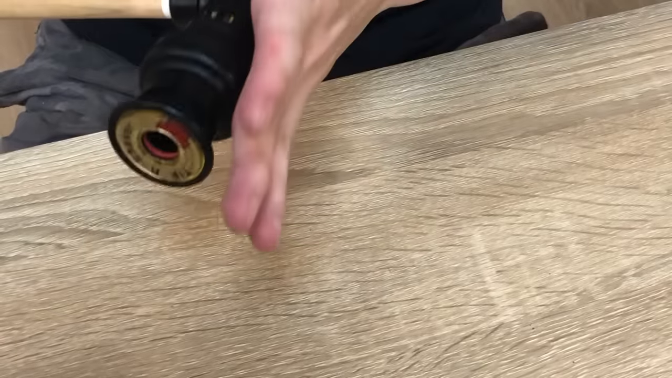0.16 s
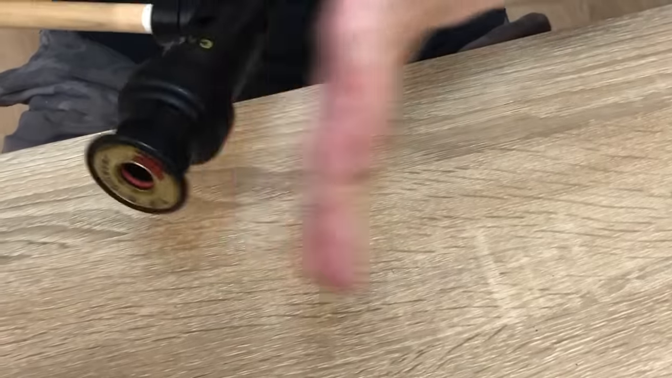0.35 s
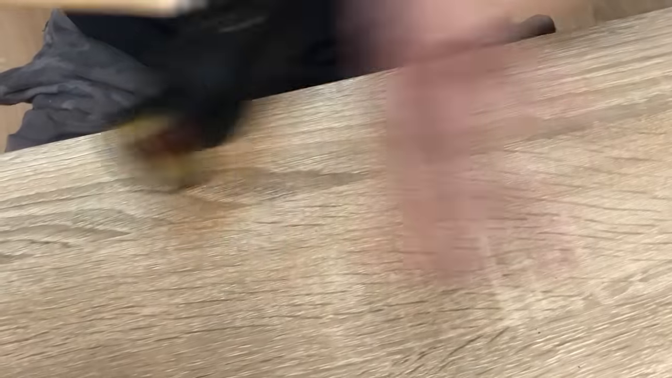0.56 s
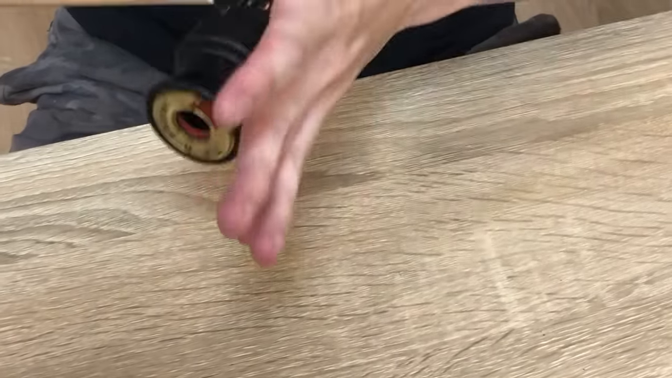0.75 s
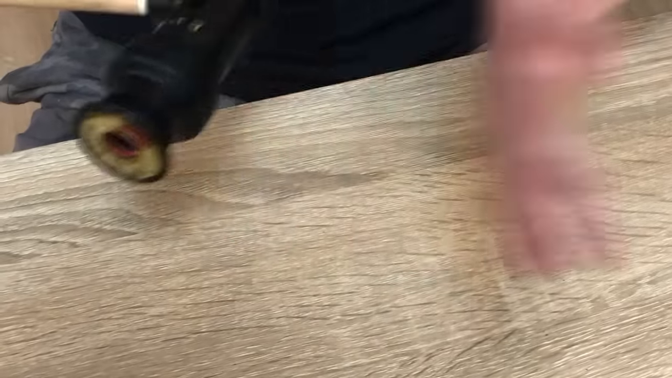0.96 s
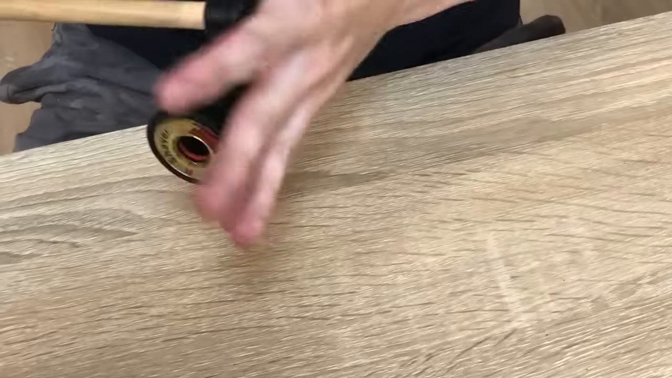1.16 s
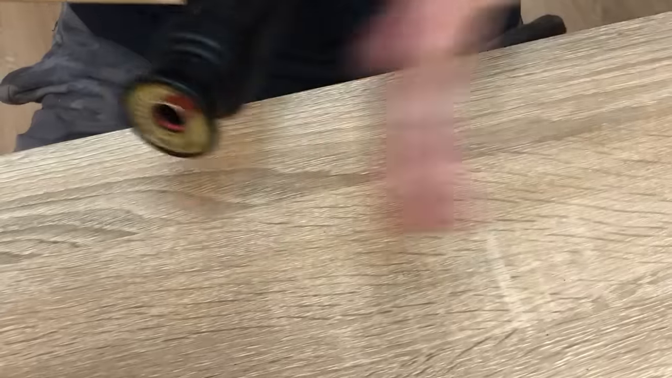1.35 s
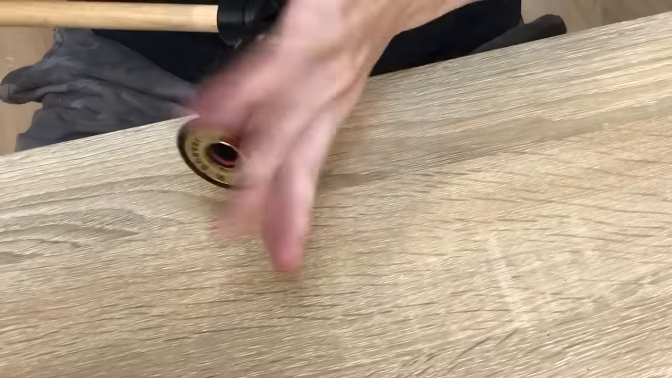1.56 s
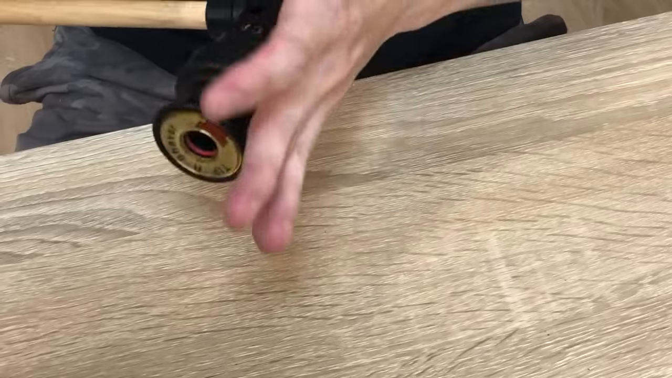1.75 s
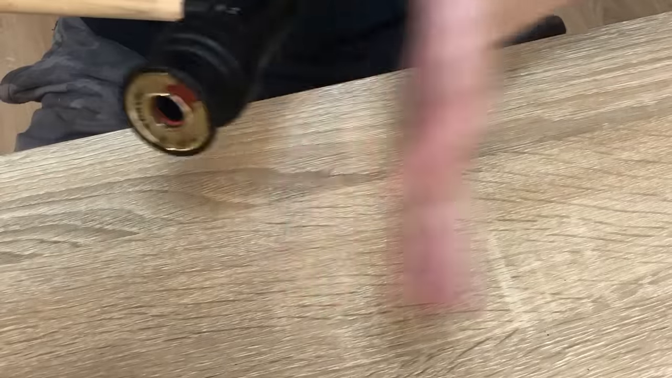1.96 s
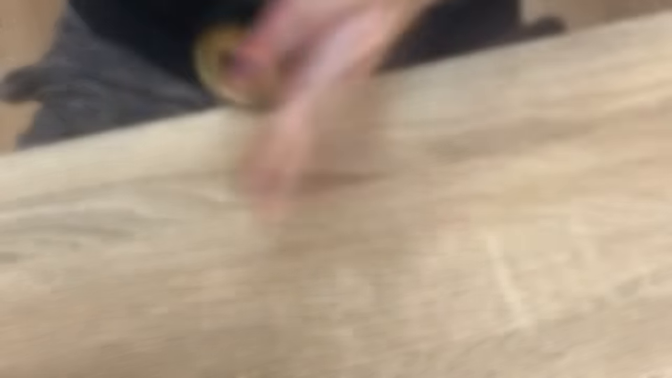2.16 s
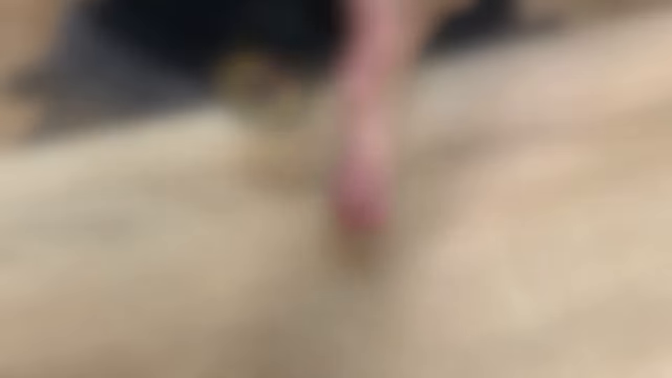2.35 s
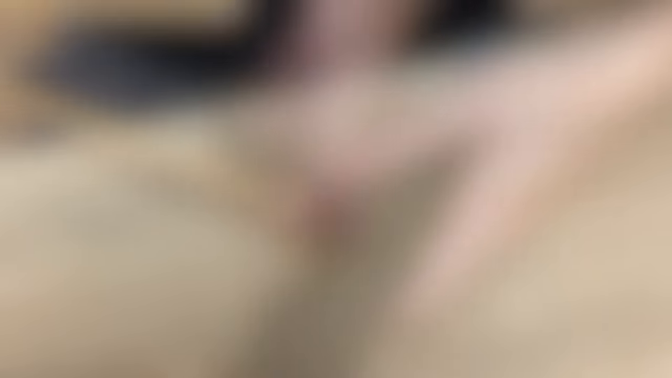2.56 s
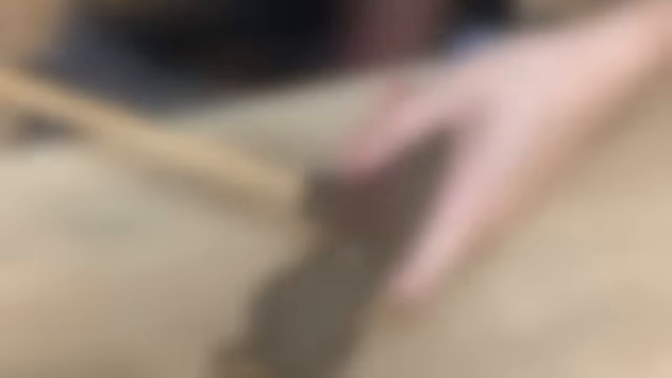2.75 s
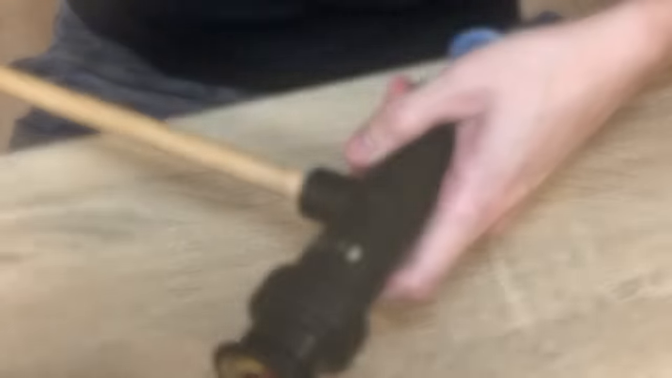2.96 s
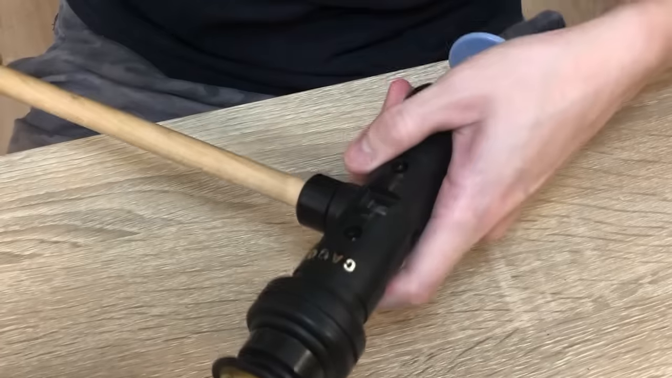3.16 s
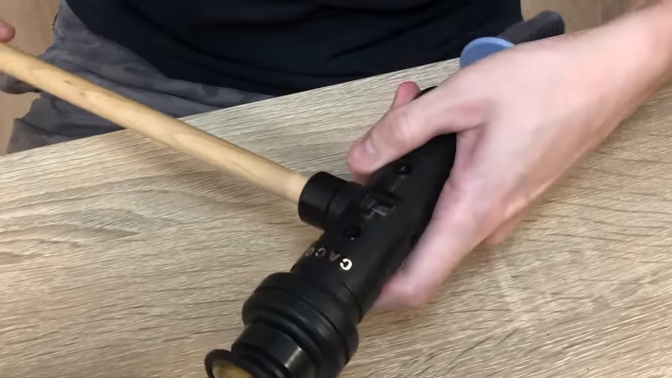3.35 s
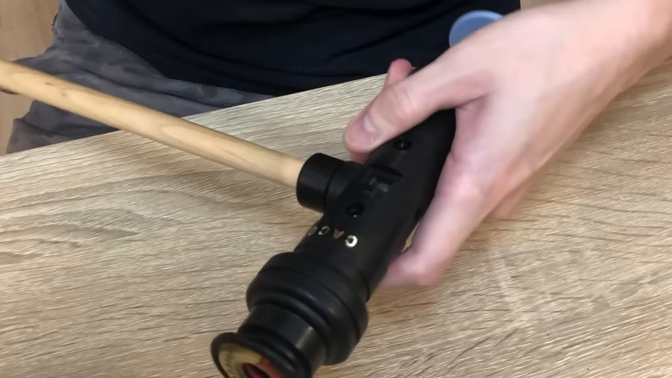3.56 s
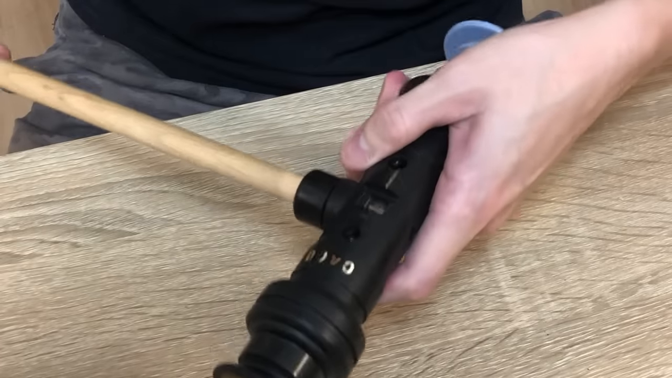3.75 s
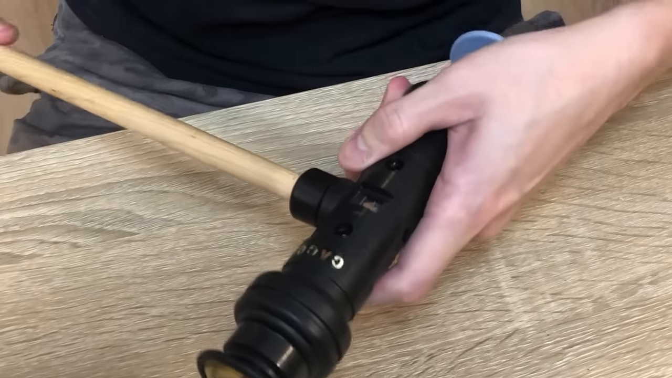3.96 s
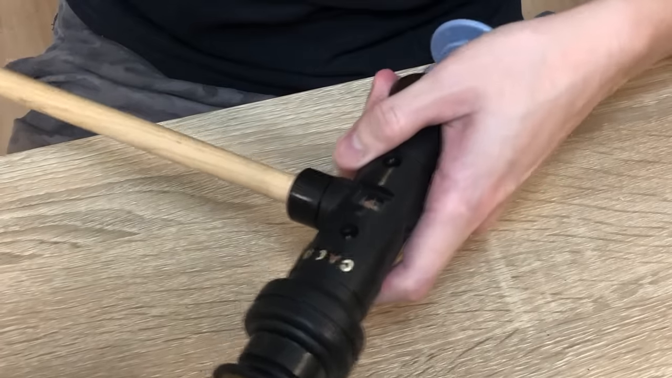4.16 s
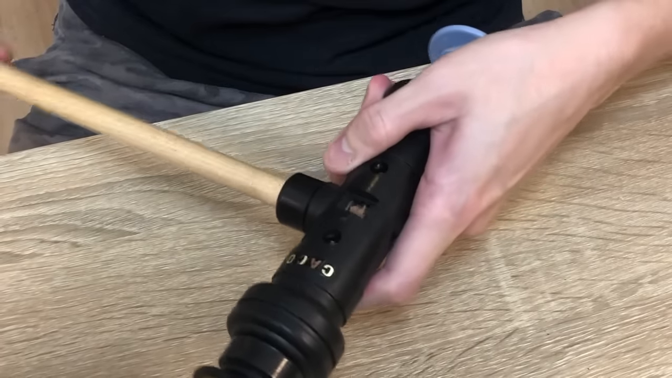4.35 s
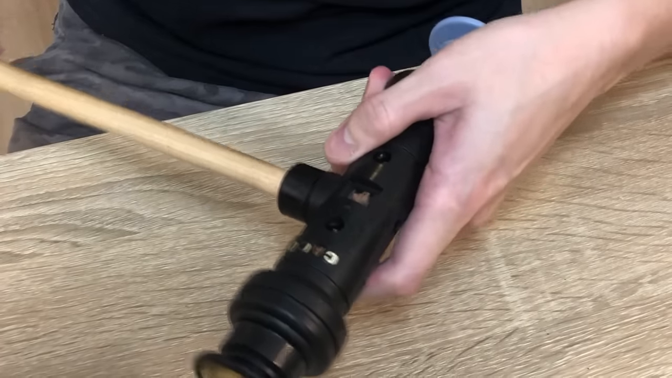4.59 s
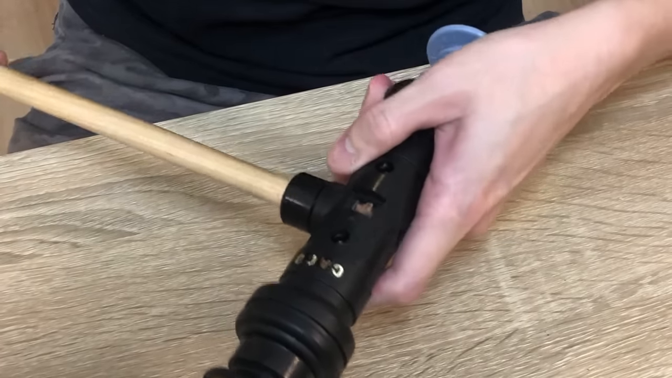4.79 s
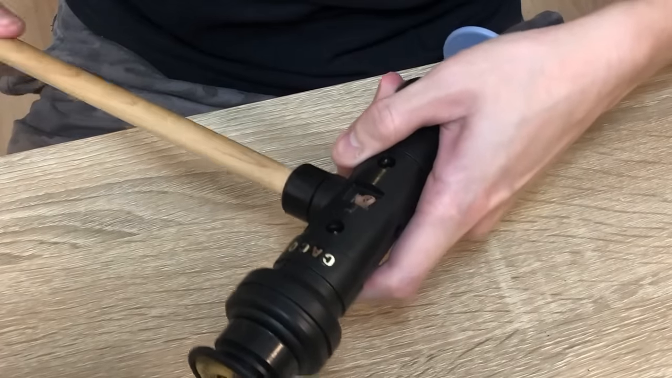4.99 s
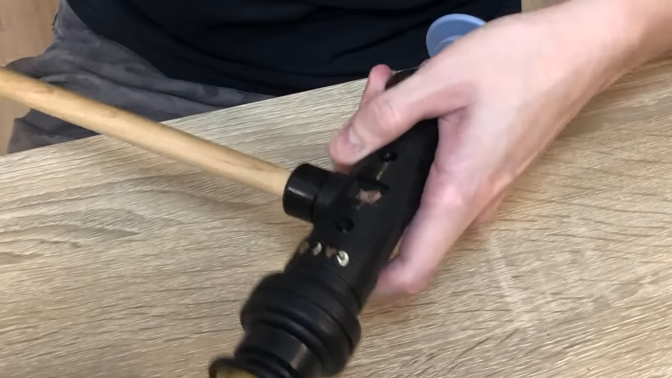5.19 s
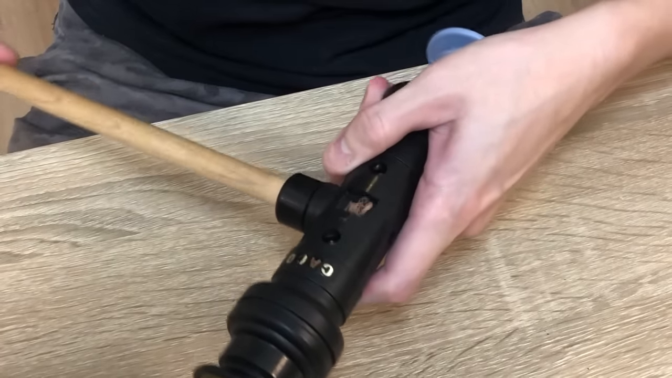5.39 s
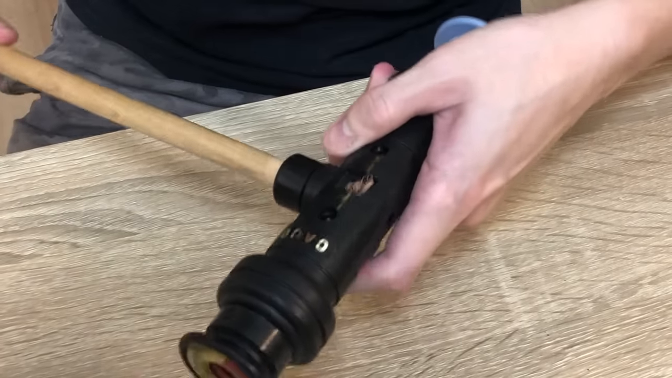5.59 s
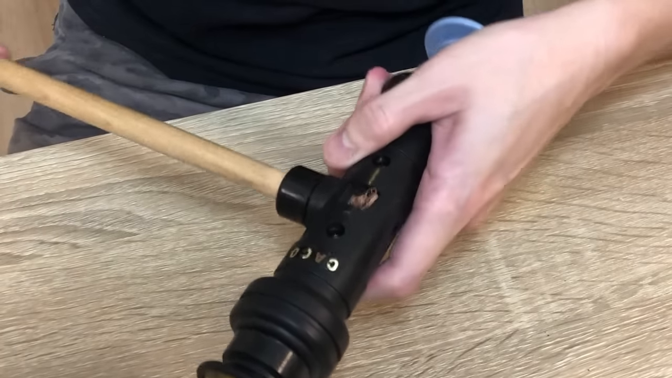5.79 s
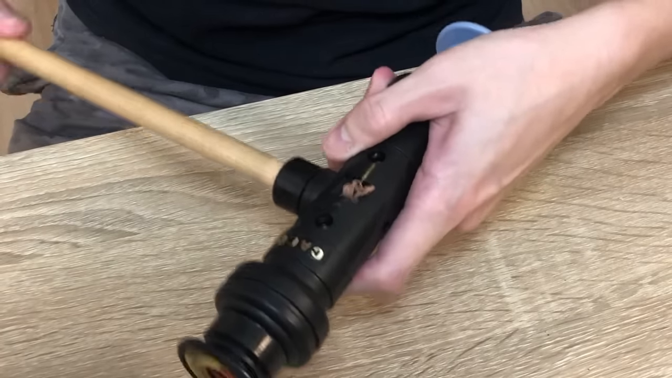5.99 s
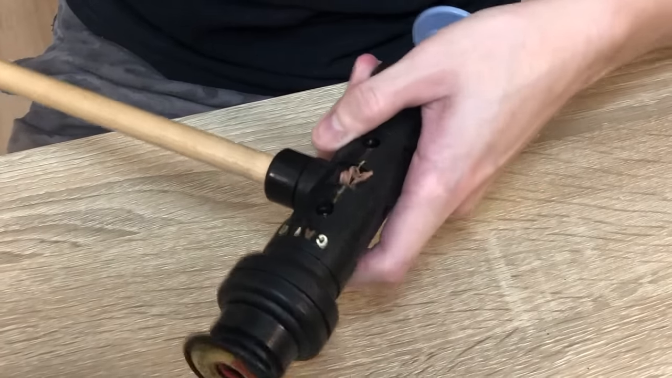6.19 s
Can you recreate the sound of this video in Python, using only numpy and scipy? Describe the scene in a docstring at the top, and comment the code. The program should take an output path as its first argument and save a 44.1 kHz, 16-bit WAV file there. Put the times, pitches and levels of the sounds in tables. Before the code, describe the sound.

A small quiet indoor room, recorded close over a table, with soft air noise and a very faint low hum. The tail of a hard plastic clack fades at the opening; dull little bumps on the table follow at 0.3 s. Sharp clacks land at 0.63, a quick pair at 1.1 and 1.16, then louder ones at 1.55, 2.2 and 2.59 s, each a bright touch, a hard slam milliseconds later and a brief hollow plastic ring. Light finger rubs and ticks lie between. The last ring is abruptly cut at 2.62 s. Then a faint, swelling scrape at 3.2 s and a crisp tick at 3.45. Five stronger dry, gritty leather-shaving rasps follow at 3.8, 4.35, 4.9, 5.4 and 5.9 s, each about a tenth of a second, starting with a bright bite and ending quickly, with barely audible regripping between.

```python
"""A small, quiet room: a plastic cue-tip tool is worked by hand over a table, amid soft air noise and a faint hum.
Its cutter snaps over several times: a bright first contact, then a hard clack that rings the housing.
After a cut in the scene the cue is twisted in the tool, and the blade shaves the leather tip in six strokes.
Impacts are coloured noise bursts, the housing is a bank of decaying sines, shaving is resonant friction noise."""
import sys
import numpy as np
from scipy import signal
from scipy.fft import rfft, irfft
from scipy.io import wavfile

SR = 44100
rng = np.random.default_rng(int(sys.argv[2]) if len(sys.argv) > 2 else 0)


def transcribe(u):
    """Save the signal u as a 16-bit wav file named by the first command-line argument.

    u: samples, shape (n,) or (channels, n), limited to [-1, 1]; the rate is SR.
    q: integer samples, one column per channel.
    """
    v = np.clip(np.atleast_2d(u).T, -1, 1)
    q = np.round(v * 32767).astype(np.int16)
    wavfile.write(sys.argv[1], SR, q)


N = 274743
LEAD_S = 0.2  # time rendered before the opening, so that earlier sounds can ring into it
PAD = int(LEAD_S * SR)
TIME = np.arange(-PAD, N) / SR
HZ = np.maximum(np.fft.rfftfreq(4096, 1 / SR), 1)  # frequency grid of all colours
TABLE_LAG_S, SHAVE_LAG_S = 0.0006, 0.00136  # lag of the table's reflection


def undb(db):
    """Decibels to gain."""
    return 10 ** (np.asarray(db) / 20)


def unit(x):
    """Scale to unit energy."""
    return x / np.sqrt(np.sum(x ** 2))


def decay(t, t60):
    """Exponential decay that falls by 60 dB in t60 seconds."""
    return np.exp(-np.log(1000) * t / t60)


def contour(points):
    """Join (Hz, value) points on a log-frequency axis."""
    f, value = np.transpose(points)
    return np.interp(np.log(HZ), np.log(f), value)


def peak(hz, width_hz, db):
    """A resonance as a bump in dB."""
    return db / (1 + (2 * (HZ - hz) / width_hz) ** 2)


def response(db):
    """Causal, minimum-phase impulse response of unit energy with the given colour."""
    cepstrum = irfft(np.log(undb(db)))
    half = len(cepstrum) // 2
    # fold the cepstrum onto positive time
    cepstrum[1:half] *= 2
    cepstrum[half + 1:] = 0
    return unit(irfft(np.exp(rfft(cepstrum)))[:half])


def through(x, ir):
    """Pass a sound through an impulse response and keep its length."""
    return signal.fftconvolve(x, ir)[:len(x)]


def add(out, s, x, lag_s=0.001, bounce=0):
    """Mix a sound in: row 0 reaches the microphone with its bounce off the table, row 1 feeds the room."""
    i = max(int(s * SR) + PAD, 0)
    fractional_delay = np.sinc(np.arange(128) - lag_s * SR)
    bounced = signal.lfilter(fractional_delay, 1, x)
    direct = (x + bounce * bounced) / np.hypot(1, bounce)
    paths = np.array([direct, x])
    out[:, i:i + len(x)] += paths[:, :len(TIME) - i]


def wavering_noise(count, rough_db, catch_hz=450):
    """Dense noise grains whose strength wanders at random, as when surfaces catch and let go."""
    at = np.arange(count) * catch_hz / SR
    catches = np.interp(at, np.arange(count), rng.standard_normal(count))
    x = rng.standard_normal(count) * undb(rough_db * catches)
    return x / x.std()


def chatter(length_s, rise=0.35):
    """Two hard faces meet: a burst of tiny impacts that swells and dies, nearly flat in spectrum."""
    t = np.arange(SR // 20) / SR
    age = t / length_s
    swell = 1 - np.exp(-age / rise)
    fade = swell * np.exp(-age)
    x = rng.standard_normal(len(t))
    for _ in range(3):
        # even out the spectrum while keeping the burst short
        spectrum = rfft(x * fade)
        x = irfft(spectrum / np.abs(spectrum), len(t))
        fade = np.sqrt(swell) * np.exp(-(age / 4) ** 2)
    return unit(x * fade)


# Colour of the still air. Each row: frequency in Hz, relative density in dB per Hz.
AIR_COLOUR = [(15, -60.5), (25, -19.5), (43, -10), (92, -6.5), (123, -2.5), (249, -5), (354, -13.5),
              (384, -10.5), (476, -11), (545, -12.5), (1130, -11.5), (2690, -26), (2990, -28.5),
              (5280, -33), (16000, -42)]
AIR_DB = -66.5
HUM_HZ, HUM_DB = 122, -79


def air(sway_db=2.0):
    """Soft, slowly swaying noise of the room with a faint hum whose phase wavers."""
    noise = wavering_noise(len(TIME), rough_db=sway_db, catch_hz=6)
    hiss = through(noise, response(contour(AIR_COLOUR)))
    waver = np.interp(TIME, np.linspace(0, N / SR, num=50), rng.standard_normal(50))
    hum = np.sqrt(2) * np.sin(2 * np.pi * HUM_HZ * TIME + 0.7 * waver)
    return undb(AIR_DB) * hiss + undb(HUM_DB) * hum


# Reverberant tail. Each row: band centre in Hz, t60 in seconds, level in dB.
REVERB_BANDS = [(149.5, 0.27, -4), (500, 0.22, -5.5), (1200, .4, -8.5), (2940, 0.36, -9), (5960, 0.36, -12),
                (10000, .32, -10.5), (15000, 0.21, -13.5)]
# Early reflections off near surfaces. Each row: delay in seconds, level in dB.
EARLY_REFLECTIONS = [(0.0108, -15), (.016, -21), (.039, -24)]


def room(build_s=0.007):
    """Impulse response of the room: a few near surfaces and a diffuse tail with a decay for each band."""
    t = np.arange(SR * 3 // 5) / SR
    noise = rfft(rng.standard_normal(len(t)))
    hz = np.maximum(np.fft.rfftfreq(len(t), 1 / SR), 1)
    centres = np.log([row[0] for row in REVERB_BANDS])
    build = 1 - np.exp(-(t / build_s) ** 2)
    ir = np.zeros(len(t))
    # bands crossfade into each other
    for share, (_, t60, db) in zip(np.eye(len(REVERB_BANDS)), REVERB_BANDS):
        band = irfft(noise * np.interp(np.log(hz), centres, share), len(t))
        ir += undb(db) * band * unit(decay(t, t60) * build)
    for delay_s, db in EARLY_REFLECTIONS:
        ir[int(delay_s * SR)] += undb(db)
    return ir


# Modes of the housing. Each row: nominal frequency in Hz, mean relative level in dB, t60 in seconds.
HOUSING_MODES = [(784.5, -5, 0.13), (1172, -3.5, 0.16), (1217, -7.5, 0.24), (1360, -3, 0.16),
                 (2000, -8, .18), (2460, -9, 0.42), (2900, -7.5, .2), (3039, -7.5, 0.23), (3100, -7, 0.19),
                 (3310, -5, 0.17), (3400, -1, 0.17), (4310, -6, .18), (5500, -14.5, .2), (5950, -9, 0.17),
                 (6670, -11, .18)]


def housing(scatter_db=2):
    """Decaying sines ring the housing; the grip shifts its modes a little at each blow."""
    t = np.arange(SR // 2) / SR
    ring = np.zeros(len(t))
    for hz, db, t60 in HOUSING_MODES:
        detune, size = rng.standard_normal(2)
        mode = np.sin(2 * np.pi * hz * (1 + 0.0034 * detune) * t)
        ring += undb(db + scatter_db * size) * mode * decay(t, t60)
    return unit(ring)


# After each full stroke the fingers take a new hold, with a rub and a faint tick.
REGRIP_S, REGRIP_SPREAD_S, REGRIP_DB = 0.272, 0.021, -77.5  # wait from the stroke's start, spread, rub level


def regrips():
    """Moments at which the fingers take a new hold: after every stroke but the first, light one."""
    return [stroke[0] + REGRIP_S for stroke in STROKES[1:]]


# Light ticks of the tool in the grip and of the blade snagging.
# Each row: start in seconds, relative level in dB, centre in Hz, width in octaves.
STRAY_TICKS = [(.886, -46.5, 3200, 0.25), (1.03, -48.5, 8040, 2.2), (1.75, -39.5, 3170, 0.32),
               (1.857, -52, 7050, 1), (2.676, -46, 8980, 0.55), (3.183, -50.5, 7500, 0.84),
               (3.455, -25.5, 4080, 1.6), (4.903, -28.5, 7035, 0.78), (4.9436, -31, 9000, 0.96),
               (5.1987, -41.5, 4050, 0.6)]
# The catch lets go just before each clack: level against the clack in dB, centre in Hz, width in octaves.
CATCH_TICK = (-45.5, 4550, 1)
# The blade bites as each full stroke begins: level against the stroke in dB, centre in Hz, width in octaves.
BITE_TICK = (9.4, 8600, .85)
# Tick of a new hold: relative level in dB, centre in Hz, width in octaves.
HOLD_TICK = (-54, 3600, 1.0)
CATCH_LEAD_S, BITE_DELAY_S = 0.022, 0.003


def ticks():
    """Gather the stray ticks, the catch before each clack, the bite of full strokes and each new hold."""
    catch_db, *catch_colour = CATCH_TICK
    bite_db, *bite_colour = BITE_TICK
    catches = [(s - CATCH_LEAD_S, db + catch_db, *catch_colour) for s, db, *_ in CLACKS]
    bites = [(s + BITE_DELAY_S, db + bite_db, *bite_colour) for s, _, db, *_ in STROKES[1:]]
    holds = [(s, *HOLD_TICK) for s in regrips()]
    return STRAY_TICKS + catches + bites + holds


# Soft bumps against the table. Each row: start in seconds, level in dB, frequency in Hz, t60 in seconds.
TABLE_BUMPS = [(0.275, -52, 423, 0.072), (0.279, -49, 199, 0.052), (.296, -47.5, 100, 0.049)]
# Fingers shifting their grip between clacks. Each row: centre in seconds, spread in seconds, level in dB.
GRIP_SHIFTS = [(.876, 0.0062, -70.5), (1.02, 0.014, -77), (1.335, 0.013, -76), (1.915, .012, -80.5)]
TICK_S = 0.0007


def handling(tick_db=4, tick_low_hz=1500, tick_high_hz=12500, bounce=0.14, ring_db=-19,
             rub_hz=5500, rub_width_hz=9000):
    """Small noise ticks that ring the housing a little, dull sine bumps and the noisy rub of fingers."""
    out = np.zeros((2, len(TIME)))
    # small plastic parts radiate little bass and blunt the highest treble
    plastic = -10 * np.log10((1 + (tick_low_hz / HZ) ** 6) * (1 + (HZ / tick_high_hz) ** 6))
    for s, db, hz, octaves in ticks():
        colour = plastic - 40 * np.log10(1 + (np.log2(HZ / hz) / octaves) ** 2 / 2)
        tick = undb(db + tick_db) * signal.fftconvolve(chatter(TICK_S), response(colour))
        add(out, s, tick, TABLE_LAG_S, bounce)
        add(out, s, undb(ring_db) * signal.fftconvolve(tick, housing()))
    t = np.arange(SR // 5) / SR
    for s, db, hz, t60 in TABLE_BUMPS:
        add(out, s, undb(db) * np.sin(2 * np.pi * hz * t) * decay(t, t60))
    rubs = GRIP_SHIFTS + [(s, REGRIP_SPREAD_S, REGRIP_DB) for s in regrips()]
    grip = sum(undb(db) * np.exp(-0.5 * ((TIME - s) / spread) ** 2) for s, spread, db in rubs)
    skin = through(wavering_noise(len(TIME), rough_db=5.5), response(peak(rub_hz, rub_width_hz, 22)))
    return out + grip * skin


# The pressure swells around this share of a stroke, over this share of it; then the rasp dies away.
SWELL_AT, SWELL_SPAN, RELEASE_DB_PER_S = 0.81, 0.33, 432


def pressure(t, length_s, attack_s, swell_db):
    """One twist of the wrist: the blade sets in, its pressure changes towards the end and it lets go."""
    swell = swell_db * np.exp(-0.5 * ((t / length_s - SWELL_AT) / SWELL_SPAN) ** 2)
    release = RELEASE_DB_PER_S * np.maximum(t - length_s, 0)
    return np.minimum(t / attack_s, 1) * undb(swell - release)


# Strokes of the blade. Each row: start in seconds, length in seconds, relative level in dB, attack in seconds,
# swell in dB, lift of the rasp's low end in dB, frequency in Hz at which the blade sings most.
STROKES = [(3.206, 0.18, -61.5, 0.025, 7, -5.5, 9200), (3.822, .104, -49.5, .002, 2.5, -2, 11300),
           (4.362, 0.089, -47.5, 0.0045, -3, -4.5, 3700), (4.884, 0.1, -47, 0.0064, 0, -2, 9200),
           (5.396, 0.1, -50, 0.01, 2, 2, 6440), (5.912, .103, -50, .007, 2, 2.5, 6500)]
# Colour of the shaving before its tilt. Each row: frequency in Hz, relative level in dB.
RASP_COLOUR = [(200, -34), (1000, -22), (1800, -10.5), (2800, -4.5), (4500, -1.5), (7000, -4.5), (8700, -5),
               (11000, -5), (15500, -5.5)]
# Resonances of the blade and its slot. Each row: nominal frequency in Hz, width in Hz, lift in dB.
BLADE_RESONANCES = [(2950, 410, 4.5), (3440, 350, 1.5), (4330, 470, 3), (6870, 1000, 3), (7300, 1100, 5.5),
                    (10100, 460, 6), (11350, 590, 3.5), (11900, 660, 2.5), (14010, 700, 5)]
RASP_TILT_DB, SING_DB = 0.47, 4.5  # per octave; lift where the blade sings


def shaving(cut_db=-0.84, wander=0.0035, bounce=0.44, sing_width_hz=550, room_colour=0.33):
    """The blade tears leather fibres: friction noise through resonances that shift from stroke to stroke."""
    direct, spread = np.zeros((2, 2, len(TIME)))
    t = np.arange(SR // 3) / SR
    for s, length_s, db, attack_s, swell_db, depth_db, sing_hz in STROKES:
        fibres = wavering_noise(len(t), rough_db=2.0)
        tearing = undb(db) * pressure(t, length_s, attack_s, swell_db) * fibres
        rasp = contour(RASP_COLOUR) + RASP_TILT_DB * np.log2(HZ)
        rasp += depth_db / (1 + (HZ / 5500) ** 4)
        slot = peak(sing_hz, sing_width_hz, SING_DB)
        for hz, width_hz, lift_db in BLADE_RESONANCES:
            slot += peak(hz * (1 + wander * rng.standard_normal()), width_hz, lift_db)
        add(direct, s, through(tearing, response(rasp + slot)), SHAVE_LAG_S, bounce)
        # the slot beams its resonances; summed over all directions the room gets a plainer rasp
        add(spread, s, through(tearing, response(rasp + room_colour * slot)))
    return undb(cut_db) * np.array([direct[0], spread[1]])


# Hard clacks of the cutter; the grip lets a low knock and a higher clink stand out at each blow.
# Each row: start in seconds, relative level in dB, length in seconds, relative level of the first contact in dB,
# thud lift in dB, knock in Hz, its lift in dB, clink in Hz, its lift in dB.
CLACKS = [(-.075, -7, 0.0035, -14, -6, 930, 8, 3220, 10),
          (0.6335, -11.5, 0.0035, -14.5, 6, 1420, 6, 3280, 8.5),
          (1.1, -10.5, 0.0032, -16.5, -0.5, 1690, 12.5, 3150, 10),
          (1.1557, -10, .002, -26, -2.5, 850, 9.5, 3300, 6),
          (1.5489, -3, .0025, -10, -5.5, 1342, 8, 3310, 6),
          (2.2058, -.5, 0.0022, -12.5, 0, 1178, 11.5, 3053, 7.5),
          (2.5876, -2, 0.0023, -13.5, 0.5, 1050, 9, 1740, 7)]
# Basic colour of a clack. Each row: frequency in Hz, relative level in dB.
CLACK_COLOUR = [(40, -34), (90, -20), (130, -9), (200, -9.5), (300, -4), (500, -6), (800, -2.5), (1100, -3),
                (2200, -1.5), (3000, -3), (4200, 0), (6500, -3), (9000, -7.5), (15500, -15)]
# Colour of the first contact. Each row: frequency in Hz, relative level in dB.
CONTACT_COLOUR = [(100, -30), (1000, -13), (3000, -11), (6000, -0.5), (9000, -4), (15500, -4.5)]
# Body resonances that every clack shares. Each row: frequency in Hz, width in Hz, lift in dB.
BODY_RESONANCES = [(782, 120, 6), (2640, 420, 4), (5500, 2200, 1)]
# a harder clack is brighter: dB per octave for each dB of level, and the level that adds no tilt
BRIGHTEN, FLAT_DB = 0.088, -5
CONTACT_LEAD = 0.82  # the first contact comes this share of the clack's length before the slam
KNOCK_WIDTH_HZ, CLINK_WIDTH = 200, 0.17  # the clink's width is a share of its frequency


def cutter(force_db=7.0, ring_db=-15, contact_s=0.0016, bounce=0.27, thud_hz=450):
    """Noise bursts: the faces touch brightly, slam home a few milliseconds later and ring the housing."""
    out = np.zeros((2, len(TIME)))
    for s, db, length_s, contact_db, thud_db, knock_hz, knock_db, clink_hz, clink_db in CLACKS:
        blow = undb(db) * chatter(length_s)
        colour = contour(CLACK_COLOUR) + BRIGHTEN * (db - FLAT_DB) * np.log2(HZ)
        colour += thud_db / (1 + (HZ / thud_hz) ** 2)
        colour += sum(peak(*resonance) for resonance in BODY_RESONANCES)
        colour += peak(knock_hz, KNOCK_WIDTH_HZ, knock_db)
        colour += peak(clink_hz, CLINK_WIDTH * clink_hz, clink_db)
        contact = signal.fftconvolve(chatter(contact_s), response(contour(CONTACT_COLOUR)))
        add(out, s - CONTACT_LEAD * length_s, undb(contact_db) * contact, TABLE_LAG_S, bounce)
        add(out, s, signal.fftconvolve(blow, response(colour)), TABLE_LAG_S, bounce)
        add(out, s, undb(ring_db) * signal.fftconvolve(blow, housing()))
    return undb(force_db) * out


CUT_S = 2.6243


def scene():
    """Two shots in one room; the cut between them chops off the last clack's tail."""
    ir = room()
    direct, spread = cutter()
    clacks = (direct + through(spread, ir)) * (TIME < CUT_S)
    direct, spread = handling() + shaving()
    work = direct + through(spread, ir)
    return (clacks + work + air())[None, PAD:]


def record(dry, rumble_hz=38, top_hz=15800):
    """The microphone sheds the deepest bass and the recorder cuts the top."""
    high_pass = signal.butter(2, rumble_hz, "high", fs=SR, output="sos")
    low_pass = signal.ellip(8, 0.2, 70, top_hz, fs=SR, output="sos")
    lean = signal.sosfilt(high_pass, dry)
    return signal.sosfilt(low_pass, lean)


dry = scene()
out = record(dry)
transcribe(out)
```